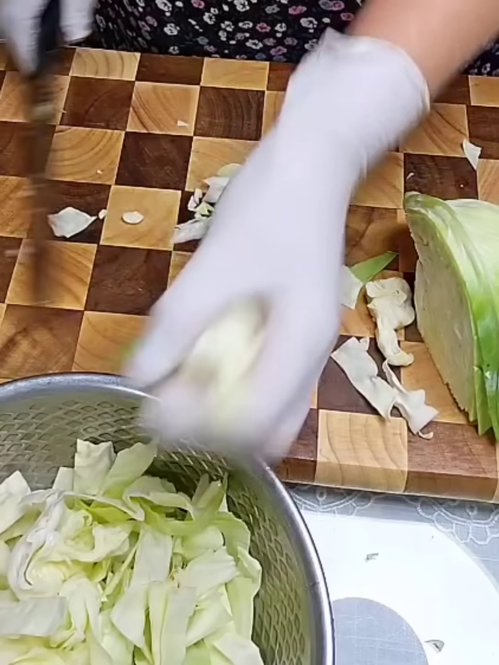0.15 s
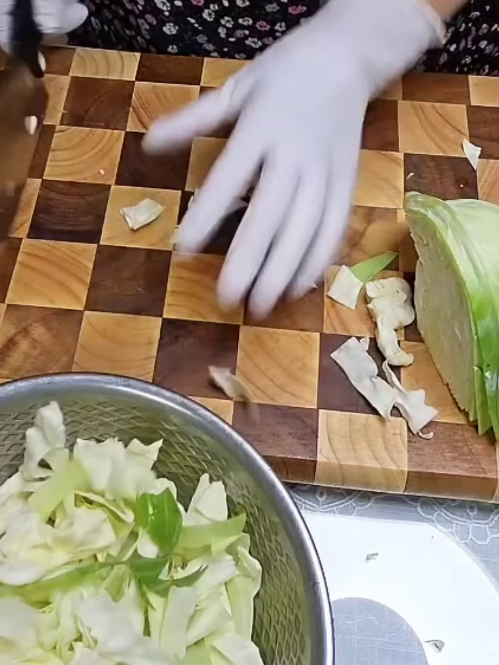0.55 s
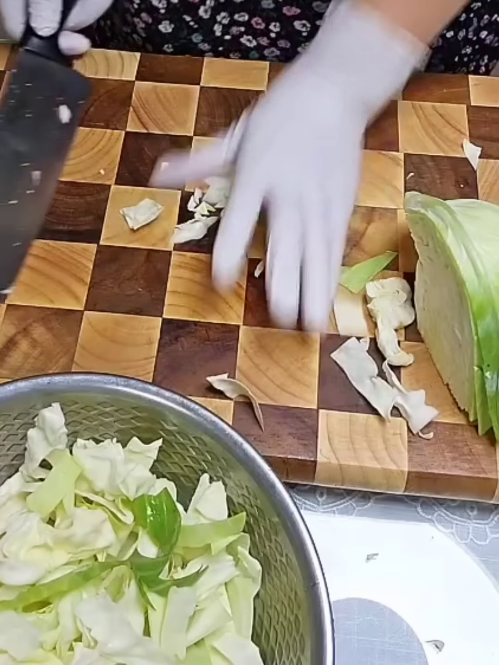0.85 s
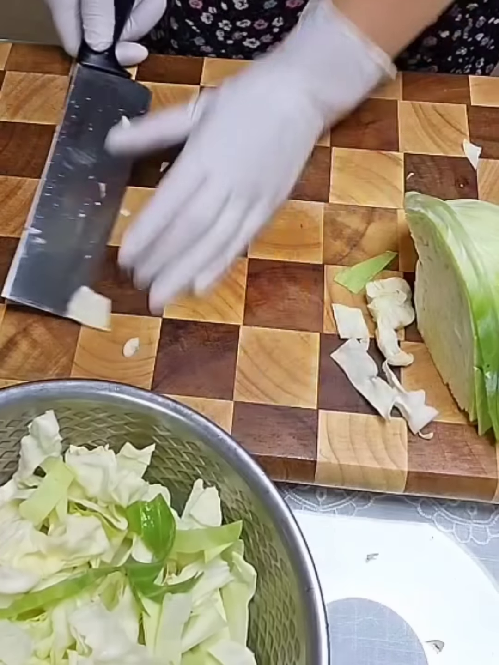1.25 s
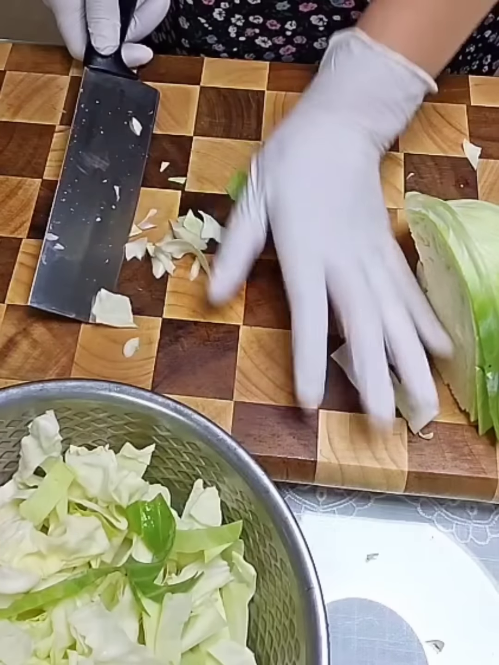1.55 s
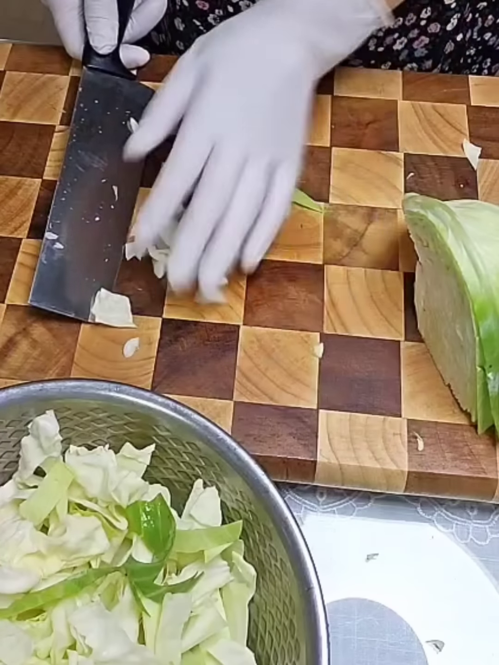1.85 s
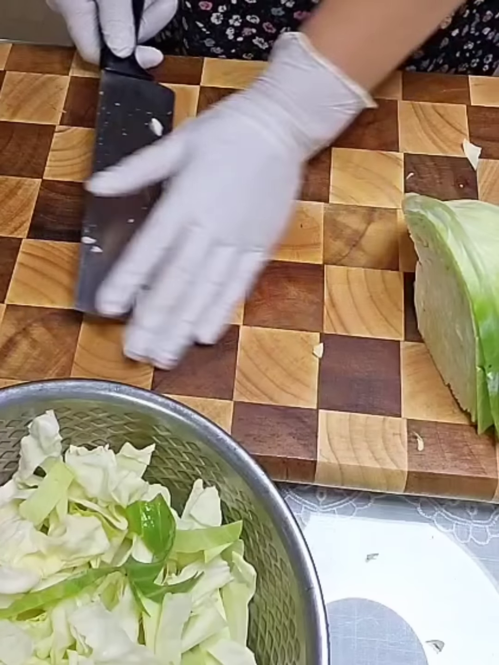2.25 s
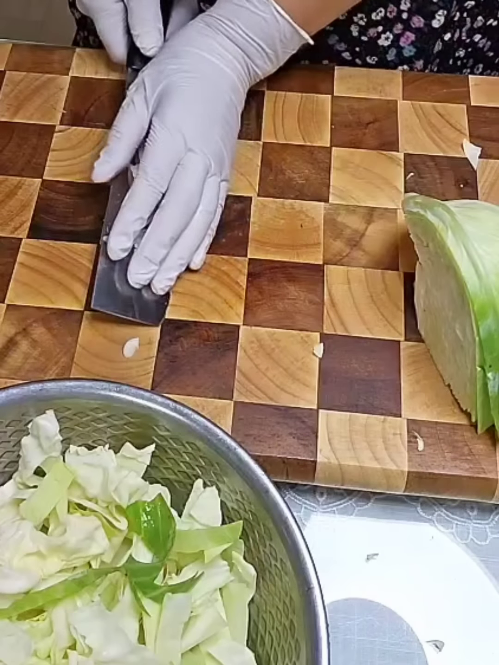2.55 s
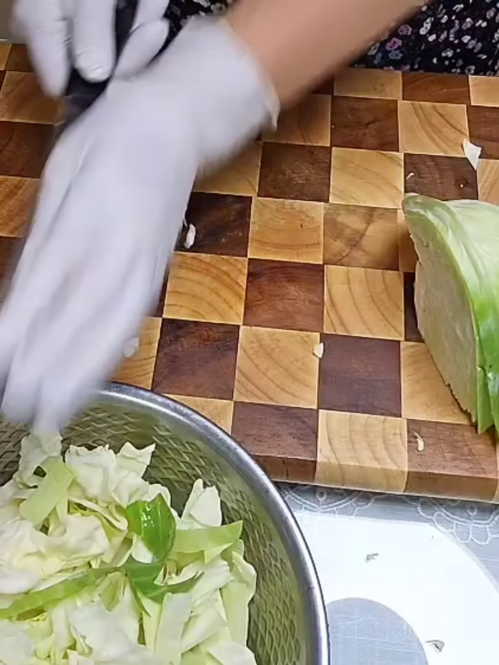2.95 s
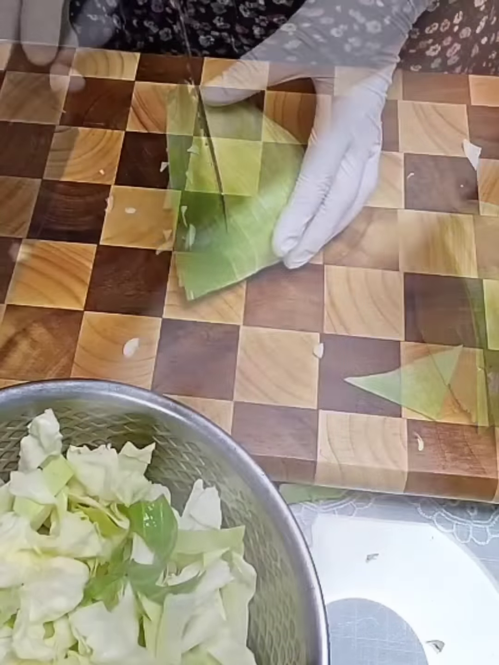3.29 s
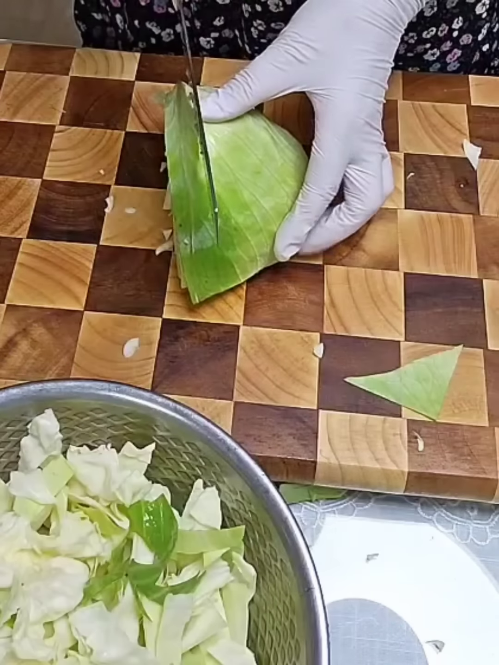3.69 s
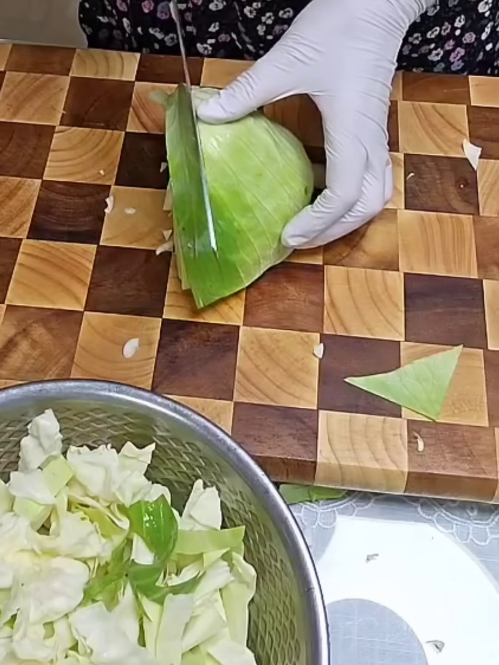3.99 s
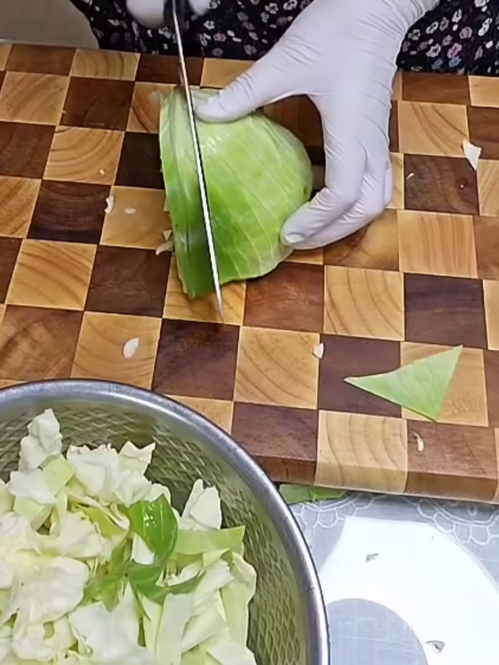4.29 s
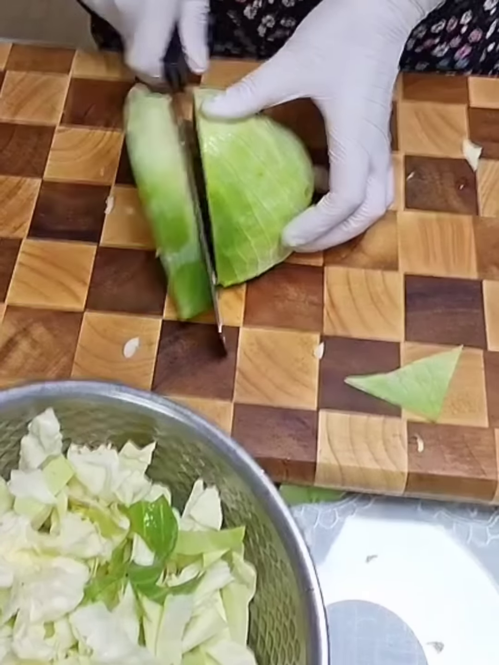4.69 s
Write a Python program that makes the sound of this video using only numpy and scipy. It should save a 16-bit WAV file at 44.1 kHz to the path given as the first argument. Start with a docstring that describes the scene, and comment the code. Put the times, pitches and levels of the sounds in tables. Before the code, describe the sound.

A close, dry-sounding kitchen scene with short echoes, faint hiss and a low drone. Tiny crisp leaf snaps open it, and at 0.15 s a knife knocks dully on the wooden board. From 0.2 to 0.45 s a handful of leaves slides into a steel mesh bowl, rustling with a fine metallic shimmer. Small snaps follow, then a loose, rattling blade clack at 0.83 s. A gloved hand brushes scraps across the wood at about 0.9-1.4 s and, more softly, 1.8-2.6 s. It is nearly quiet until bright leaf cracks at 3.9 and 4.15 s. The blade crunches through cabbage from 4.2 s, landing firmly at 4.5-4.6 s, with a duller thud at 5.1 s. More snaps and crunching from 5.55 s end in the loudest, solid knock at 6.03 s with lesser knocks just after. A faint brush and small snaps close around 6.45 s.

```python
"""A knife on a wooden board in a small kitchen, heard from close above: blows ring modes as dying sines.
The blade crunches twice through a wedge of cabbage, landing on the wood: dense clicks for bursting cells.
Before that, a gloved hand drops torn leaves into a steel mesh bowl (clicks through narrow resonances)
and sweeps up scraps (coloured friction clicks); leaves snap throughout.
Bumps, worktop rumble, short echoes and faint hiss with a drone complete it. Table levels are relative."""
import sys
import numpy as np
from scipy import signal
from scipy.io import wavfile
from scipy.ndimage import uniform_filter1d

SR = 44100
rng = np.random.default_rng(int(sys.argv[2]) if len(sys.argv) > 2 else 0)


def master_out(mix):
    """Clip the mix to full scale and print it as 16-bit PCM to the path in sys.argv[1]."""
    frames = np.transpose(np.atleast_2d(mix))
    ceiling = np.clip(frames, -1, 1)
    pcm = np.round(ceiling * 32767).astype(np.int16)
    wavfile.write(sys.argv[1], SR, pcm)


N = 301644
T = np.arange(N) / SR

# knife meets board: t/s, level/dB, press (0 loose to 1 firm), low-pass f/Hz, blade note f/Hz
KNIFE_BLOWS = [(0.1474, -28.5, 0.4, 1280, 1090), (0.831, -27, 0.03, 2680, 1525),
               (1.153, -50, .3, 4000, 2800), (4.115, -54, 0.65, 3500, 2030), (4.4895, -33.5, 1, 2800, 2070),
               (4.586, -34.5, 0.91, 1600, 767), (5.105, -43, 0.47, 900, 705),
               (5.1167, -38.5, 0.4, 696, 625), (6.0346, -24, 0.86, 2700, 1600),
               (6.1053, -36, 0.53, 1690, 1490), (6.174, -45.5, 0.6, 1520, 1070)]
# modes of the wooden board: f/Hz, level/dB, t60/s under a loose blade
BOARD_MODES = [(142, -8.5, 0.47), (287, -12.5, 0.22), (440, -66, 0.062), (596, 1, 0.069), (653, -3.5, 0.1),
               (682, -3, 0.11), (793, -6, 0.1), (879, -2, 0.06), (1094, -4, 0.11), (1340, -39, .06),
               (1464, -5, 0.14), (1518, -1.5, 0.067), (1553, 5, 0.037), (1835, -15.5, 0.29),
               (1970, -12, 0.053), (2510, -12, 0.059), (3240, -50, 0.037)]
# thud under a pressed blade: f/Hz, level/dB, t60/s
THUD_MODES = [(717, 2, 0.017), (487, -3.5, 0.0091), (1435, -26, 0.0023), (3057, -7, 0.012)]
# modes of the steel blade: f/Hz, level/dB, t60/s
BLADE_MODES = [(2352, 2.5, 0.063), (3475, -4, 0.1), (3840, -1, 0.03), (4190, -19, 0.064),
               (5400, -24, 0.041), (6330, -15, .06), (7430, -14, .05)]
# spectrum of the blade's tick: f/Hz, level/dB
TICK_STEEL = [(300, -36), (1500, -4), (2700, -1), (4000, 0.0), (8000, -9.5), (15000, -24)]
# spectrum of the rattle and bounce: f/Hz, level/dB
CLATTER = [(400, -40), (620, 4), (900, 0), (1250, -1.0), (1550, -6), (1800, 4.5), (2100, -50), (4000, -36.0)]
# pressing lowers the board's high-pass, so it reaches the bass, and shortens its ring by a factor
LOOSE_LOW_HZ, PRESSED_LOW_HZ, PRESSED_RING = 1170, 111, 0.57
# level against the ring when loose, and the change when fully pressed
THUD_DB, THUD_PRESS_DB, RATTLE_DB, RATTLE_PRESS_DB = -2.5, 21, -4.5, -1.5
# a sharper blow, one with a higher low-pass, ticks louder
TICK_DB, TICK_REF_HZ, TICK_DB_PER_OCTAVE = -1.5, 2600, 12.5
BOUNCE_S, BOUNCE_DB = 0.007, -4.5  # a loose blade lands a second time


def knocks():
    """Modal impact: a blow rings board and blade; contact pressure sets bass, damping, thud and bounce."""
    t = np.arange(SR // 2) / SR
    out = np.zeros(N)
    for s, db, press, high_hz, blade_hz in KNIFE_BLOWS:
        length = PRESSED_RING ** press
        low_hz = LOOSE_LOW_HZ * (PRESSED_LOW_HZ / LOOSE_LOW_HZ) ** press
        wood = ring([(hz, mode_db, t60 * length) for hz, mode_db, t60 in BOARD_MODES], t)
        wood = band(band(wood, low_hz, "high"), high_hz, "low")

        thud = amp(THUD_DB + THUD_PRESS_DB * press) * ring(THUD_MODES, t) * (1 - np.exp(-t / 0.0012))

        click = colour(rng.standard_normal(len(t)) * np.exp(-t / 0.0074), TICK_STEEL)
        tick = 0.33 * click + 0.31 * ring(BLADE_MODES, t)
        tick *= amp(TICK_DB + TICK_DB_PER_OCTAVE * np.log2(high_hz / TICK_REF_HZ))
        note = np.sin(2 * np.pi * blade_hz * t) * np.exp(-t / (0.017 * length ** 2))

        rattle = clatter(t, high_hz)
        bounce = clatter(t, high_hz)
        rattle_gain = amp(RATTLE_DB + RATTLE_PRESS_DB * press)
        add(out, s, amp(db) * (wood + thud + tick + note + rattle_gain * rattle))
        looseness = max(1 - press, 0)
        add(out, s + BOUNCE_S, amp(db + BOUNCE_DB) * looseness * (tick + amp(1) * bounce))
    return out


def clatter(t, high_hz):
    """Broadband contact noise: an exponentially decaying burst shaped by a spectrum."""
    burst = rng.standard_normal(len(t)) * np.exp(-t / 0.01)
    return band(colour(burst, CLATTER), high_hz, "low")


# pushes of the blade through the wedge: t/s, length/s, crunch level/dB, board level/dB
BLADE_PUSHES = [(4.174, 0.026, -48, -47.5), (4.301, 0.021, -41.5, -43), (4.34, 0.0086, -48, -41.5),
                (4.383, 0.021, -48, -51), (4.412, 0.074, -46, -43.5), (4.508, .15, -52, -46.5),
                (4.761, 0.047, -67, -62), (5.648, 0.0092, -42, -50), (5.684, 0.062, -41.5, -45.5),
                (5.757, 0.099, -44.5, -44.5), (5.899, 0.081, -59, -56.5), (5.984, 0.04, -40, -41.5),
                (6.033, 0.11, -50.5, -46.5)]
# spectrum of crisp leaf tissue, shared by cuts and snaps: f/Hz, level/dB
CRISP_LEAF = [(300, -37.5), (900, 6.5), (1600, 2), (2400, 0.5), (3200, 5.5), (4000, 6.5), (5200, 1),
              (6800, -7.5), (9500, -3), (12500, -15), (15500, -1.5)]
# spectrum of the wood driven by leaves, shared by cuts and snaps: f/Hz, level/dB
DRIVEN_WOOD = [(40, -8.5), (140, -4.5), (220, -14), (400, -7.5), (560, -7), (680, 1), (900, 1.5),
               (1200, -3.5), (1550, -8.5), (2200, -8), (4000, -21.5)]
CUT_RISE_S, CUT_T60_S = 0.0033, 0.097
CUT_SWELL_DB, CUT_BOARD_SWELL_DB = 1.5, 6  # change over a push, as the blade nears the wood
CUT_CATCH_DB = 1.5  # the blade catches and slips


def cuts():
    """Fracture noise: cells burst in a dense crunch, single fibres crack and the board murmurs beneath."""
    cells = grains(per_s=12000, spread_db=-0.5, clump_db=1.0)
    fibres = grains(per_s=200, spread_db=1.5, clump_db=1.5)
    crunch, push = np.zeros((2, N))
    for s, length, crunch_db, board_db in BLADE_PUSHES:
        crunch += amp(crunch_db) * stroke(s, length, CUT_RISE_S, CUT_T60_S, CUT_SWELL_DB)
        push += amp(board_db) * stroke(s, length, CUT_RISE_S, CUT_T60_S, CUT_BOARD_SWELL_DB)
    tearing = (cells + fibres / 2) * catching(CUT_CATCH_DB)
    leaf = amp(-2.0) * colour(tearing * crunch, CRISP_LEAF)
    wood = amp(-4.5) * colour(tearing * push, DRIVEN_WOOD)
    return leaf + wood + amp(-10) * board(cells * push)


# leaves snapping: t/s, level/dB, length/s, leaf resonance f/Hz
LEAF_SNAPS = [(.002, -45, 0.007, 4650), (.029, -42, 0.0038, 4150), (0.057, -41, 0.0028, 4140),
              (.476, -47.5, 0.012, 7600), (.503, -44, 0.011, 3520), (.544, -46, 0.0052, 5360),
              (.648, -52, 0.0077, 6760), (.714, -52.5, 0.0062, 7500), (0.777, -52, 0.0089, 4500),
              (1.155, -48, 0.0038, 5360), (1.976, -48.5, 0.0044, 7250), (2.8047, -44.5, 0.0026, 5640),
              (2.812, -48, 0.01, 5770), (3.357, -48.5, 0.0039, 5500), (3.367, -57, 0.0043, 4200),
              (3.891, -35, 0.0018, 4700), (3.898, -29, 0.001, 3930), (3.900, -40, 0.02, 3970),
              (4.007, -44, 0.0076, 4030), (4.1145, -45.5, 0.0023, 4400), (4.147, -37.5, 0.005, 3600),
              (4.152, -35.5, 0.019, 3640), (5.105, -45, 0.022, 3950), (5.551, -46.5, 0.0024, 10400),
              (5.584, -38, .001, 9100), (5.607, -40, 0.0016, 8750), (5.612, -40.5, 0.0038, 7400),
              (5.726, -36, 0.016, 3900), (5.975, -45, 0.0027, 3960), (6.073, -40.5, .003, 4700),
              (6.126, -38.5, 0.0023, 7400), (6.408, -56, .002, 6500), (6.475, -52.5, 0.016, 3760)]
# a thicker rib takes longer to break and to fade
SNAP_T60_S, SNAP_REF_S, SNAP_T60_POWER = 0.028, 0.0032, 0.46
# and shakes the board more, per doubling of its length
SNAP_BOARD_DB, SNAP_BOARD_DB_PER_OCTAVE = -14.5, 4
SNAP_CLICK_DB = 12  # the first break against the run of cells


def snaps():
    """Brittle fracture: a crack and a short run of bursting cells excite the leaf and, in part, the board."""
    t = np.arange(SR // 4) / SR
    leaf, burst, push = np.zeros((3, N))
    cells = grains(per_s=18000, spread_db=3.0, clump_db=2.04)
    for s, db, length, leaf_hz in LEAF_SNAPS:
        thickness = length / SNAP_REF_S
        t60 = SNAP_T60_S * thickness ** SNAP_T60_POWER
        run = amp(db - 60 * np.maximum(t - length, 0) / t60) * cells[round(s * SR):][:len(t)]
        run[SR // 1000] += amp(db + SNAP_CLICK_DB)
        add(burst, s, run)
        add(push, s, run * amp(SNAP_BOARD_DB + SNAP_BOARD_DB_PER_OCTAVE * np.log2(thickness)))
        # the shorter the snap, the more of it is one clean crack
        crack = np.exp(-t / 0.00018) * np.sin(2 * np.pi * leaf_hz * t)
        crack *= amp(db - 1) * np.exp(-length / 0.0022)
        add(leaf, s, crack + amp(3.5) * resonate(run, leaf_hz, width=950))
    return leaf + amp(-10.5) * colour(burst, CRISP_LEAF) + amp(-1.5) * colour(push, DRIVEN_WOOD)


# glove and scraps sweeping the wood: t/s, length/s, hiss level/dB, board level/dB
GLOVE_SWEEPS = [(0.453, 0.22, -64, -68.5), (0.905, 0.29, -52.5, -55.5), (1.315, 0.095, -50.5, -56.5),
                (1.829, 0.12, -58.5, -61.5), (2.23, 0.18, -54.5, -54), (2.508, 0.093, -57, -59.5),
                (6.47, 0.062, -58, -59)]
# spectrum of the glove's hiss: f/Hz, level/dB
GLOVE_HISS = [(500, -19), (1500, -8), (2300, -5.5), (3200, -3), (5000, -3.5), (6800, -10.5), (9500, -7),
              (12500, -14.5), (15500, -7)]
# spectrum of the drag on the wood: f/Hz, level/dB
DRAG = [(100, -5.0), (280, -1.5), (480, -3.5), (630, 5.0), (1150, -10), (1480, 0.0), (2100, -5.0),
        (4000, -23.5)]
SWEEP_RISE_S, SWEEP_T60_S, SWEEP_SWELL_DB = 0.021, 0.35, -3
SWEEP_CATCH_DB = 2  # the glove catches and slips


def sweeps():
    """Stick-slip friction: the glove rubs the wood finely, with small ticks as scraps catch and slip."""
    rub = grains(per_s=9000, spread_db=0.5, clump_db=1.55)
    ticks = grains(per_s=120, spread_db=0.0, clump_db=3.0)
    rub = rub + ticks / 4
    hiss, push = np.zeros((2, N))
    for s, length, hiss_db, board_db in GLOVE_SWEEPS:
        friction = rub * stroke(s, length, SWEEP_RISE_S, SWEEP_T60_S, SWEEP_SWELL_DB)
        hiss += amp(hiss_db) * friction
        push += amp(board_db) * friction
    uneven = catching(SWEEP_CATCH_DB)
    hiss *= uneven ** 0.34  # the board feels the catches more than the hiss does
    push *= uneven
    return amp(-2.0) * colour(hiss, GLOVE_HISS) + amp(-8.5) * board(push) + amp(-6.5) * colour(push, DRAG)


# resonances of the steel mesh bowl: f/Hz, width/Hz, level/dB
BOWL_RESONANCES = [(1480, 40, -9), (1850, 27, -7), (2400, 35, -6), (2750, 35, -12), (3140, 30, -5),
                   (3480, 35, -11), (3780, 45, 0), (3930, 50, -6), (4635, 39, -4), (5130, 40, -10),
                   (5550, 45, -8), (6990, 53, -10), (8040, 63, -2), (8800, 90, -9), (9030, 120, -8),
                   (9200, 60, -10), (10040, 90, -6), (10600, 54, -10), (11200, 70, -12), (14000, 160, -12),
                   (14400, 60, -12), (15200, 80, -10)]
# spectrum of the rustling leaves: f/Hz, level/dB
LEAF_RUSTLE = [(240, -26), (400, -7.5), (763, 1.5), (1350, -15), (1890, 3), (2140, -55), (2350, -10),
               (2740, -21), (3840, 0), (4140, -8), (6570, -14), (8030, -14), (15800, -17)]
# a handful of leaves slides into the bowl, louder as more of it lands
DROP_S, DROP_LENGTH_S, DROP_DB = 0.2, 0.2, -42.5
DROP_RISE_S, DROP_T60_S, DROP_SWELL_DB = 0.019, 0.1, 5


def drop():
    """Driven resonance: leaves brush the mesh, whose narrow resonances vary as the contact moves."""
    brush = grains(per_s=10000, spread_db=2.5, clump_db=2.5)
    steel = np.zeros(N)
    knots = T[::1500]
    for hz, width, db in BOWL_RESONANCES:
        contact = np.interp(T, knots, rng.standard_normal(len(knots)))
        steel += amp(db + 2 * contact) * resonate(brush, hz, width)
    slide = amp(DROP_DB) * stroke(DROP_S, DROP_LENGTH_S, DROP_RISE_S, DROP_T60_S, DROP_SWELL_DB)
    return slide * (amp(-10.0) * colour(brush, LEAF_RUSTLE) + amp(-2.5) * unit(steel))


# soft bumps of hand and wedge: t/s, level/dB, low-pass f/Hz
SOFT_BUMPS = [(.53, -58, 40), (0.619, -62, 39.3), (1.979, -59, 60), (3.251, -62, 45), (3.905, -65, 150),
              (4.189, -63.5, 160), (4.674, -49.5, 150), (5.721, -55.5, 40), (6.176, -54.5, 183),
              (6.41, -60, 46)]
BUMP_RING_DB = 23  # the board's low modes against the worktop's rumble
BUMP_T60_S = 0.35  # the soft leaves damp the board


def bumps():
    """Soft impact: a long contact acts as a low-pass, leaving mainly the board's lowest modes, damped."""
    t = np.arange(SR // 2) / SR
    out = np.zeros(N)
    wood = ring(BOARD_MODES, t) * amp(-60 * t / BUMP_T60_S)
    for s, db, high_hz in SOFT_BUMPS:
        add(out, s, amp(db + BUMP_RING_DB) * band(wood, high_hz, "low"))
    return out


# spectrum of the worktop's rumble: f/Hz, level/dB
RUMBLE = [(25, -10.5), (60, 18.0), (90, -12.0), (135, 13.5), (190, -17), (280, -9.0), (450, -31.0),
          (1200, -48)]
RUMBLE_DB, RUMBLE_PRESS_DB = -26.5, 4  # against a loose blow, and the change when fully pressed


def worktop():
    """Structure-borne sound: blows and bumps shake the worktop under the board as decaying low noise."""
    t = np.arange(SR // 2) / SR
    shake = np.zeros(N)
    blows = [(s, db + RUMBLE_DB + RUMBLE_PRESS_DB * press) for s, db, press, *_ in KNIFE_BLOWS]
    for s, db, *_ in blows + list(SOFT_BUMPS):
        add(shake, s, amp(db) * (1 - np.exp(-t / 0.00081)) * np.exp(-t / 0.066))
    return colour(shake * rng.standard_normal(N), RUMBLE)


# reverberation of the kitchen: f/Hz, t60/s
KITCHEN_DECAY = [(150, 0.97), (700, 0.38), (2000, 0.54), (5000, 0.39), (14000, 0.57)]


def kitchen(x, near_db, tail_db):
    """Reverberation: early scatter from worktop and bowl, then a wall tail decaying by frequency."""
    t = np.arange(SR // 2) / SR
    signs = rng.choice([-1., 1.], (2, len(t)))
    near, far = signs * (rng.random((2, len(t))) < 0.1)  # sparse echoes
    near = near * (t > 0.003) * np.exp(-t / 0.02)
    hz, when, z = signal.stft(far * (t > 0.012), SR, nperseg=256)
    decay = amp(-60 * when / read(KITCHEN_DECAY, hz)[:, None])
    far = signal.istft(z * decay, SR, nperseg=256)[1][:len(t)]
    echo = amp(near_db) * near / np.linalg.norm(near) + amp(tail_db) * far / np.linalg.norm(far)
    return x + signal.fftconvolve(x, echo)[:N]


# broad spectrum of the faint background hiss: f/Hz, level/dB
BACKGROUND_HISS = [(15, -44), (25, -35), (49, 3), (91, -14), (130, -16.5), (200, -3.5), (361, -7),
                   (392, -12), (425, -10.5), (857, -7.5), (1640, -17), (2150, -33), (3050, -12.5),
                   (4820, -16), (15800, -37.5)]
# finer colour of the background hiss: f/Hz, level/dB
HISS_FINE_COLOUR = [(1500, 2), (2100, 9.5), (2700, 0.5), (3000, -0.5), (5300, 5.5), (5600, 0), (6900, -2),
                    (8000, 5), (10300, 8), (11400, 2.5), (12800, 3), (15200, 9)]
# low drone of the kitchen: f/Hz, width/Hz, level/dB
DRONES = [(62, 5.3, -78.5), (137.3, 3.3, -74)]
HISS_DB = -64.5  # rms level of the background hiss


def background():
    """Filtered noise: a faint coloured hiss, and narrow bands that waver as a low drone."""
    hiss = colour(colour(rng.standard_normal(N), BACKGROUND_HISS), HISS_FINE_COLOUR)
    out = amp(HISS_DB) * unit(hiss)
    for hz, width, db in DRONES:
        out += amp(db) * unit(resonate(rng.standard_normal(N), hz, width))
    return out


def board(x):
    """Modal filtering: friction rings the board, mostly at 450-900 Hz; keeps the power of white noise."""
    middle = signal.butter(1, [450, 900], "band", fs=SR, output="sos")
    taps = signal.sosfilt(middle, ring(BOARD_MODES, np.arange(SR // 4) / SR))
    return signal.oaconvolve(x, taps / np.linalg.norm(taps))[:N]


def ring(modes, t):
    """Modal superposition: dying sines of alternating sign."""
    out = np.zeros(len(t))
    for k, (hz, db, t60) in enumerate(modes):
        out += (-1) ** k * amp(db - 60 * t / t60) * np.sin(2 * np.pi * hz * t)
    return out


def grains(per_s, spread_db, clump_db):
    """Random impulse process: tiny clicks of uneven size in clumps a few ms long; rms 1."""
    clicks = rng.choice([-1., 1.], N) * (rng.random(N) < per_s / SR)
    clumps = unit(uniform_filter1d(rng.standard_normal(N), size=160))
    sizes = np.minimum(rng.exponential(1, N), 4)
    return unit(clicks * amp(spread_db * sizes + clump_db * clumps))


def stroke(start, length, rise, t60, swell_db):
    """Amplitude envelope: a movement sets in, swells or eases while it lasts, and dies away."""
    t = T - start
    onset = (1 + np.tanh(t / rise / 2)) / 2
    swell = swell_db * (np.clip(t / length, 0, 1) - 0.5)
    return onset * amp(swell - 60 * np.maximum(t - length, 0) / t60)


def catching(db):
    """Amplitude modulation: the uneven gain of something that catches and slips."""
    points_per_s = 55
    return amp(db * np.interp(T * points_per_s, np.arange(2048), rng.standard_normal(size=2048)))


def colour(x, spectrum, size=4096):
    """Minimum-phase filtering: a causal filter of given spectrum; keeps the power of white noise."""
    log_gain = np.log(amp(read(spectrum, abs(np.fft.fftfreq(size, 1 / SR)))))
    response = np.exp(np.conj(signal.hilbert(log_gain)))
    taps = np.fft.ifft(response).real[:size // 2]
    return signal.oaconvolve(x, taps / np.linalg.norm(taps))[:len(x)]


def resonate(x, hz, width):
    """Damped resonator: a complex one-pole filter of about unit peak gain."""
    r = np.exp(-np.pi * width / SR)
    return 2 * signal.lfilter([1 - r], [1, -r * np.exp(2j * np.pi * hz / SR)], x).real


def band(x, hz, kind):
    """Second-order filtering: a gentle high-pass or low-pass."""
    return signal.sosfilt(signal.butter(2, min(hz, SR / 3), kind, fs=SR, output="sos"), x)


def read(points, hz):
    """Logarithmic interpolation: reads a table of (f/Hz, value) on a log-frequency axis."""
    f, value = np.transpose(points)
    return np.interp(np.log(hz + 1), np.log(f + 1), value)


def amp(db):
    """Decibel law: amplitude from level."""
    return 10 ** (np.asarray(db) / 20)


def unit(x):
    """Normalisation to rms 1."""
    return x / np.sqrt(np.mean(x ** 2) + 1e-20)


def add(mix, s, sound):
    """Superposition: adds a sound to the mix, in place, from s seconds on."""
    part = mix[round(s * SR):][:len(sound)]
    part += sound[:len(part)]


def scene():
    """Superposition: wood, leaves and bowl, each with its own echoes, over worktop and background."""
    wood = kitchen(knocks() + bumps(), near_db=-8.5, tail_db=-9.0)
    leaves = kitchen(cuts() + snaps() + sweeps(), near_db=-17.0, tail_db=-8)
    bowl = kitchen(drop(), near_db=-2.5, tail_db=-8.5)
    return (wood + leaves + bowl + worktop() + background())[None]


EDGE_HZ = 15560  # upper band limit


def record(dry):
    """Band limitation: a steep linear-phase low-pass."""
    taps = signal.firwin(511, EDGE_HZ, window=("kaiser", 8), fs=SR)
    return signal.oaconvolve(dry, taps[None], "same")


dry = scene()
out = record(dry)
master_out(out)
```